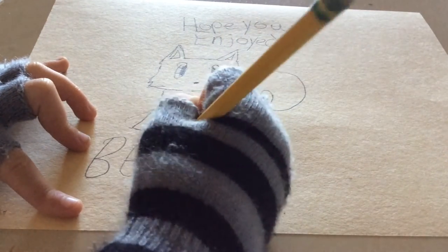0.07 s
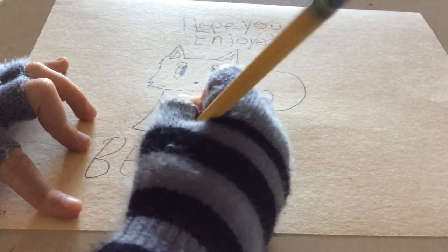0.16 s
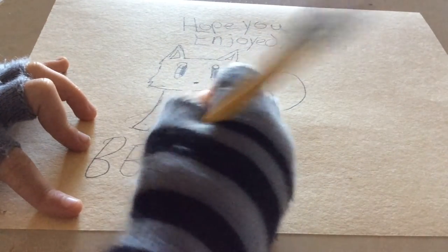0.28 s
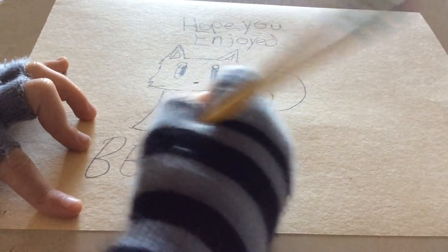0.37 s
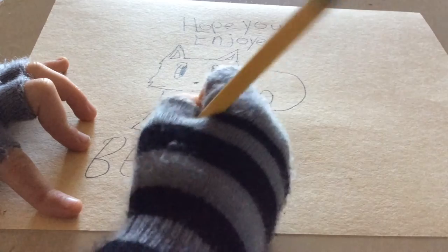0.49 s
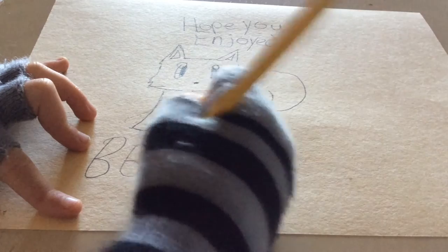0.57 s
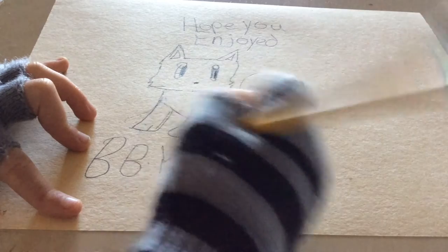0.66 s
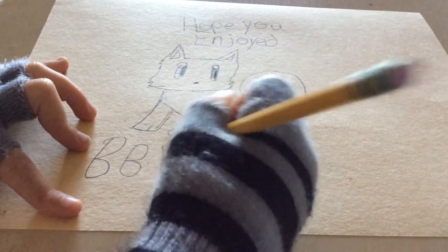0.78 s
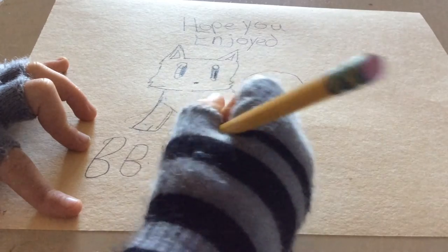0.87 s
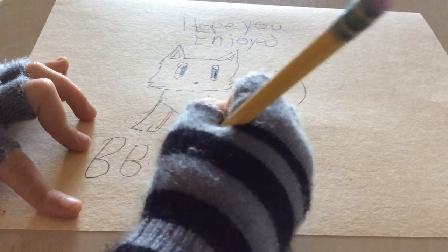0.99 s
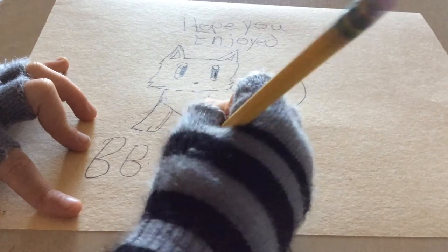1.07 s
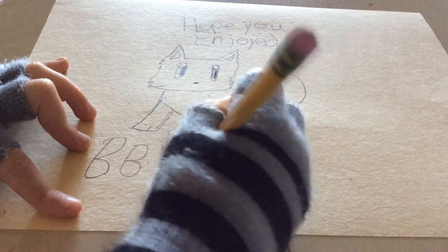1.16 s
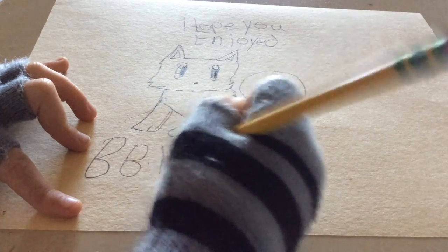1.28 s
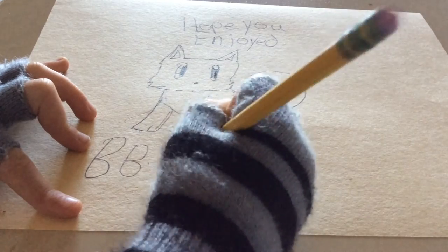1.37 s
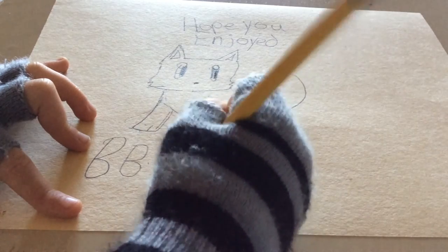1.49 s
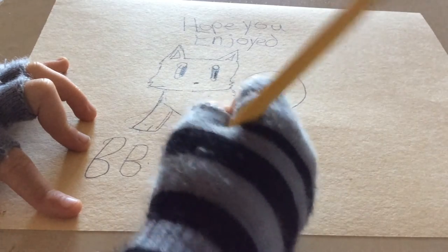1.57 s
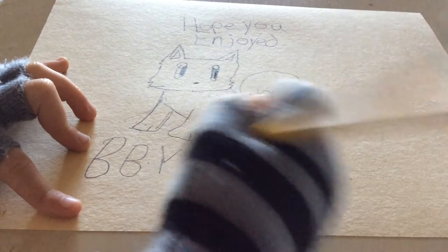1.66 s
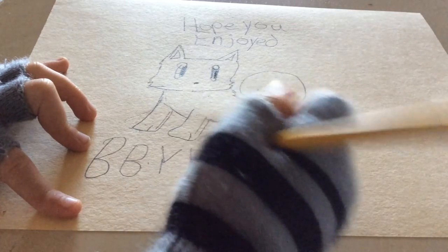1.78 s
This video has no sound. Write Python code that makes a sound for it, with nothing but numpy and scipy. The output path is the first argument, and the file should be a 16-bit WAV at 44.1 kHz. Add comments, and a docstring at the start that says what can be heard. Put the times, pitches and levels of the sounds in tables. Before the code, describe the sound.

Pencil writing on paper, close up: brief dry scratches and soft desk thuds in a quiet room

```python
"""A pencil prints letters on a sheet of paper lying on a wooden desk, close by in a quiet room.
Friction of the lead on the fibres is a train of random slips: it hisses in the paper and rumbles in the desk.
Each landing is a half-sine of force that rings the modes of the desk top: a dull thud with a faint tick.
A gloved hand slides along the sheet, its heel murmurs on the desk, and a faint steady noise lies beneath."""
import sys
import numpy as np
from scipy import signal
from scipy.fft import rfft, irfft, next_fast_len
from scipy.io import wavfile
from scipy.ndimage import map_coordinates

SR = 44100
rng = np.random.default_rng(int(sys.argv[2]) if len(sys.argv) > 2 else 0)


def store_pcm(level_fs):
    """Save levels as 16-bit WAV."""
    pcm = np.round(np.clip(level_fs, -1, 1) * 32767).astype(np.int16)
    wavfile.write(sys.argv[1], SR, np.atleast_2d(pcm).T)


N = 81585  # length in samples

# Strokes of the lead. Each row: start in seconds, length in s, rise in s, fall in s, scratch level in dB,
# extra treble in dB, force on the desk in dB before its filters, moment of most pressure as a share of
# the length, contact cut-off in Hz.
STROKES = [ (-.02, 0.16, 0.071, 0.079, -61.5, -6, -49, 0.43, 760),
           (0.194, .071, 0.022, 0.0091, -57, 0, -36, 0.53, 770),
           (0.249, 0.042, 0.0027, 0.013, -66.5, -15, -75, .3, 900),
           (0.299, 0.026, 0.0087, 0.0075, -72, -0.5, -61, 0.6, 700),
           (0.422, 0.043, 0.036, 0.01, -64.5, -0.5, -41, 0.37, 876),
           (.506, .09, 0.01, 0.043, -59, 1, -40, 0.22, 600),
           (0.624, 0.011, 0.0069, 0.0055, -77.5, 3.5, -52, 0.68, 700),
           (0.951, 0.12, 0.057, 0.065, -58.5, -7.5, -44.5, 0.49, 493),
           (1.1, 0.015, 0.0048, 0.0056, -63, -16, -55.5, 0.12, 1210),
           (1.107, 0.11, 0.037, 0.12, -55, -3.5, -47, 0.4, 1620),
           (1.231, 0.025, 0.006, 0.011, -72, -3, -60.5, 0.65, 680),
           (1.402, 0.031, 0.0086, .014, -66.5, -2, -49.5, 0.27, 653),
           (1.477, 0.098, 0.033, 0.042, -59, -2.5, -35, 0.52, 600),
           (1.625, 0.02, 0.0092, 0.0067, -75.5, 5, -60.5, 0.57, 700), ]
# Spectra of the scratch and of its sizzling treble. Each row: frequency in Hz, relative level in dB.
SCRATCH_COLOUR = [(200, 6), (500, 8.5), (1000, 8), (1280, 2), (1440, 2), (1750, -6.5), (2000, -0.5),
                  (3050, -0.5), (3500, -0.5), (3900, 0.5), (4300, -8), (4850, -0.5), (5350, 1),
                  (5800, -5.5), (7200, -12.5), (9000, -5.5), (15000, -13)]
SIZZLE_COLOUR = [(6000, -31), (7600, -10.5), (8500, 5), (9500, 3), (10300, -7), (11300, 1.5), (12400, -2.5),
                 (13300, -22.5), (14700, -21), (16000, -3.5)]
# Narrow resonances of pencil and sheet. Each row: frequency in Hz, width in Hz, gain in dB.
PENCIL_MODES = [(1425, 62, -1), (1660, 80, 7), (3462, 143, 2), (5550, 104, -1), (8570, 250, -5.5),
                (11340, 280, -1)]
# Modes of the desk top. Each row: frequency in Hz, relative level in dB, own 60 dB decay time in s.
DESK_MODES = [(61.3, -0.5, 0.02), (106, -13, 0.19), (132.2, -9, .17), (302.9, -0.5, 0.11),
              (346, -4.5, 0.09), (407.4, 4.5, 0.049), (486, -8, 0.026), (549.7, -2.5, 0.056),
              (682.5, -16, 0.15), (821, -28.5, 0.12), (1056, -6, 0.016), (1156, -9, 0.11), (1365, -2, 0.04),
              (1570, -11.5, 0.069)]
# The lead lands or catches. Each row: start in s, thud peak in dB, contact time in s,
# low cut in Hz, tick level in dB relative to the thud peak.
KNOCKS = [(0.041, -42.5, 0.0011, 183, -28), (.111, -44, 0.00073, 98, -6), (0.2239, -33.5, .0013, 230, -32),
          (0.435, -19.5, 0.00096, 45, -31.5), (0.5276, -39.5, 0.0018, 217, -31),
          (.5455, -34.5, 0.0013, 213, -48), (.9044, -29.5, .00135, 46, -18.5),
          (1.0216, -42.5, 0.0015, 196, -41), (1.135, -34.5, 0.0017, 246, -39),
          (1.4075, -35.5, 0.0022, 45.4, -43), (1.499, -32.5, 0.0015, 240, -31),
          (1.5304, -28.5, 0.0015, 131, -48)]
# Spectrum of the lead's tick. Each row: frequency in Hz, relative level in dB.
TICK_COLOUR = [(300, 12), (1600, -7.5), (2300, 4), (3000, -32), (5000, -12), (9000, -26), (15000, -34)]
# The glove slides on the sheet. Each row: start in s, length in s, rise in s, fall in s, level in dB.
SLIDES = [(0.667, 0.12, 0.072, 0.051, -64), (0.818, 0.095, 0.12, 0.0069, -69.5),
          (1.041, 0.064, 0.018, .02, -76), (1.257, 0.1, 0.078, 0.041, -76),
          (1.684, .13, 0.063, 0.034, -67.5)]
# Spectra of the glove and of a faint rubbing. Each row: frequency in Hz, relative level in dB.
GLOVE_COLOUR = [(100, 0), (700, 0), (1700, -1), (2700, 3.5), (3800, -0.5), (5000, 6.5), (6700, -6.5),
                (8500, -3.5), (12000, -8), (15000, -24)]
RUB_COLOUR = [(200, -4), (950, -34), (1200, -2), (1420, -4.5), (1650, -21), (2400, -6.5), (4000, -29),
              (12000, -37)]
# When the rubbing sounds. One row: start in s, length in s, rise in s, fall in s.
RUB_SPAN = (1.055, 0.404, 0.024, .046)
# The heel of the hand shifts its weight. Each row: start in s, length in s, level in dB.
SHIFTS = [(-.03, 0.21, -57.5), (0.215, 0.13, -62), (0.45, 0.12, -56), (0.555, 0.13, -62.5),
          (0.858, 0.045, -64), (0.937, 0.19, -63), (1.09, .17, -58), (1.273, 0.085, -68),
          (1.485, 0.084, -48), (1.57, .11, -66.5)]
# Spectrum of the heel's murmur. Each row: frequency in Hz, relative level in dB.
HEEL_COLOUR = [(25, -71), (55, 6.5), (90, -5), (112, 0.5), (127, 11.5), (145, -8), (180, -7.5),
               (240, -23.5), (292, 4.5), (340, -0.5), (600, -42), (1200, -61), (4000, -125)]
# Decay of the room. Each row: frequency in Hz, 60 dB decay time in s.
ROOM_DECAY = [(100, 0.34), (400, 0.28), (1500, 0.4), (5000, 0.48), (12000, 0.05)]
# Spectrum of the steady noise. Each row: frequency in Hz, relative level in dB.
FLOOR_COLOUR = [(20, -29), (50, 9.5), (120, 6.5), (190, 6), (300, 4), (500, -2.5), (1300, -7.5),
                (2000, -11.5), (5000, -13.5), (7000, -18.5), (9000, -11.5), (15000, -29)]

FIBRES_PER_S, FIBRE_SPREAD_DB = 9000, 3
FLUTTER_PER_S, FLUTTER_DB = 85, 1.46  # the lead's uneven grip
SIZZLE_DB = -0.5  # over the scratch, before each stroke's extra treble
BUMPS_PER_S, BUMP_SPREAD_DB, BUMP_LOW_HZ = 1600, 4.5, 140
PRESSURE_SAG_DB, TOUCH_S = 22.5, 0.0029  # from firmest moment to a stroke's ends; time to make or lose contact
PAPER_PAD_HZ = 1070  # the sheet cushions each landing
HAND_DAMPING_DB_PER_S = 116  # the landed point and hand press on the desk and shorten its ring
TICK_T60_S = 0.016
WOOL_SLIPS_PER_S, WOOL_SPREAD_DB = 6600, 2
RUB_DB, FLOOR_DB = -76.5, -71.5
SHIFT_RISE, SHIFT_FALL = 0.5, 0.49  # shares of a shift's length
DESK_ROOM_DB, PAPER_ROOM_DB, ROOM_DELAY_S = -17.5, -16.5, 0.0055
TOP_HZ = 15450


def amp(db):
    """Level to amplitude: 20 dB is a factor of ten."""
    return 10 ** (np.asarray(db) / 20)


def unit(x):
    """Normalisation to an rms of 1."""
    return x / np.sqrt(np.mean(x ** 2) + 1e-20)


def along(points, hz):
    """Interpolation of (Hz, value) points on a logarithmic frequency axis."""
    f, value = np.transpose(points)
    return np.interp(np.log(hz + 1), np.log(f + 1), value)


def filtered(x, response):
    """Linear filtering: the spectrum is multiplied by a response of frequency."""
    m = next_fast_len(N + SR // 2)
    hz = np.fft.rfftfreq(m, 1 / SR)
    return irfft(rfft(x, m) * response(hz), m)[:N]


def coloured(x, points):
    """Spectral shaping by (Hz, dB) points, at rms 1."""
    return unit(filtered(x, lambda hz: amp(along(points, hz))))


def soften(x, hz):
    """Contact compliance: a soft contact passes little above its cut-off."""
    return signal.sosfilt(signal.butter(2, hz, fs=SR, output="sos"), x)


def low_cut(x, hz):
    """High-pass coupling: a light contact moves little below its low cut."""
    return signal.sosfilt(signal.butter(2, hz, "high", fs=SR, output="sos"), x)


def gate(start, length, rise, fall):
    """Amplitude envelope: quarter-sine rise and fall, multiplied where they overlap."""
    t = np.arange(N) / SR - start
    opening = np.sin(np.pi / 2 * np.clip(t / rise, 0, 1))
    closing = np.sin(np.pi / 2 * np.clip((length - t) / fall, 0, 1))
    return opening * closing


def slips(rate, spread_db):
    """Stick-slip friction: tiny impulses at random times, of random size and sign."""
    happens = rng.random(N) < rate / SR
    size = amp(spread_db * rng.standard_normal(N))
    return unit(happens * size * rng.choice([-1, 1], N))


def wobble(rate):
    """Slow random modulation: a smooth curve through rate random knots a second."""
    knots = rng.standard_normal(N // 20)
    return map_coordinates(knots, [np.arange(N) * rate / SR], mode="mirror")


def pencil_response(f):
    """Resonance: the direct sound plus one band-pass peak for each mode of pencil and sheet."""
    response = 1
    for hz, width, db in PENCIL_MODES:
        response = response + amp(db) * 1j * f * width / (hz * hz - f * f + 1j * f * width)
    return response


def scratch():
    """Friction noise: the moving lead plucks paper fibres, and pencil and sheet ring with them."""
    fibres = slips(FIBRES_PER_S, FIBRE_SPREAD_DB) * amp(FLUTTER_DB * wobble(FLUTTER_PER_S))
    fibres = filtered(fibres, pencil_response)
    body, sizzle = coloured(fibres, SCRATCH_COLOUR), coloured(fibres, SIZZLE_COLOUR)
    out = np.zeros(N)
    for start, length, rise, fall, db, treble_db, _, _, _ in STROKES:
        stroke = body + amp(SIZZLE_DB + treble_db) * sizzle
        out += amp(db) * gate(start, length, rise, fall) * stroke
    return out


def desk_ring():
    """Modal impulse response: decaying cosines of the desk top, at unit energy."""
    t = np.arange(SR // 4) / SR
    ring = sum(amp(db - 60 * t / t60) * np.cos(2 * np.pi * hz * t) for hz, db, t60 in DESK_MODES)
    return ring / np.linalg.norm(ring)


def rumble():
    """Forced vibration: coarser bumps shake the desk, most where the hand presses hardest."""
    t, force = np.arange(N) / SR, np.zeros(N)
    bumps = slips(BUMPS_PER_S, BUMP_SPREAD_DB)
    for start, length, _, _, _, _, db, firmest, contact_hz in STROKES:
        # 0 at the firmest moment, 1 at either end
        away = np.interp(t, [start, start + length * firmest, start + length], [1, 0, 1])
        pressure = amp(db - PRESSURE_SAG_DB * away) * gate(start, length, TOUCH_S, TOUCH_S)
        force += soften(bumps * pressure, contact_hz)
    return signal.fftconvolve(low_cut(force, BUMP_LOW_HZ), desk_ring())[:N]


def knocks():
    """Impact: a half-sine of force through the paper rings the desk, with a decaying noise tick."""
    thuds, ticks = np.zeros(N + SR), np.zeros(N + SR)
    t = np.arange(SR // 4) / SR
    ring = desk_ring() * amp(-HAND_DAMPING_DB_PER_S * t)
    for start, db, contact, low_hz, tick_db in KNOCKS:
        push = np.sin(np.pi * np.clip(t / contact, 0, 1))
        struck = signal.fftconvolve(ring, push)[:len(t)]
        thud = low_cut(soften(struck, PAPER_PAD_HZ), low_hz)
        span = slice(round(start * SR), round(start * SR) + len(t))
        thuds[span] += amp(db) * thud / np.abs(thud).max()
        ticks[span] += amp(db + tick_db - 60 * t / TICK_T60_S)
    return thuds[:N] + ticks[:N] * coloured(rng.standard_normal(N), TICK_COLOUR)


def glove():
    """Sliding friction: wool fibres brush over the sheet as the hand moves on."""
    wool = coloured(slips(WOOL_SLIPS_PER_S, WOOL_SPREAD_DB), GLOVE_COLOUR)
    return wool * sum(amp(db) * gate(start, length, rise, fall) for start, length, rise, fall, db in SLIDES)


def rub():
    """Band-shaped noise: one faint narrow rubbing swells and fades."""
    return amp(RUB_DB) * coloured(rng.standard_normal(N), RUB_COLOUR) * gate(*RUB_SPAN)


def heel():
    """Low coloured noise: it murmurs as the heel of the hand shifts its weight on the desk."""
    weight = sum(amp(db) * gate(start, length, SHIFT_RISE * length, SHIFT_FALL * length)
                 for start, length, db in SHIFTS)
    return coloured(rng.standard_normal(N), HEEL_COLOUR) * weight


def room(x):
    """Reverberation: a delayed tail of noise decays at its own rate in each band, the top treble fastest."""
    hz, t, bands = signal.stft(rng.standard_normal(SR // 2), SR, nperseg=256)
    t60 = along(ROOM_DECAY, hz)[:, None]
    # the root evens out the energy of long and short decays
    tail = signal.istft(bands * amp(-60 * t / t60) / np.sqrt(t60), SR, nperseg=256)[1]
    delayed = np.pad(tail / np.linalg.norm(tail), (round(ROOM_DELAY_S * SR), 0))
    return signal.fftconvolve(x, delayed)[:N]


def floor():
    """Stationary noise: the faint steady background of the room."""
    return amp(FLOOR_DB) * coloured(rng.standard_normal(N), FLOOR_COLOUR)


def scene():
    """Superposition: desk and paper, their reverberation, the heel and the steady noise add up."""
    desk = knocks() + rumble()
    paper = scratch() + glove() + rub()
    reverberation = room(amp(DESK_ROOM_DB) * desk + amp(PAPER_ROOM_DB) * paper)
    return (desk + heel() + paper + reverberation + floor())[None]


def record(dry):
    """Band limitation: nothing is kept from the top frequency upward."""
    return filtered(dry[0], lambda hz: hz < TOP_HZ)[None]


dry = scene()
out = record(dry)
store_pcm(out)
```